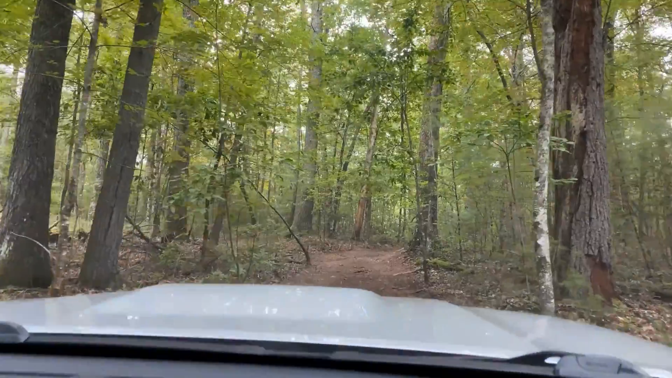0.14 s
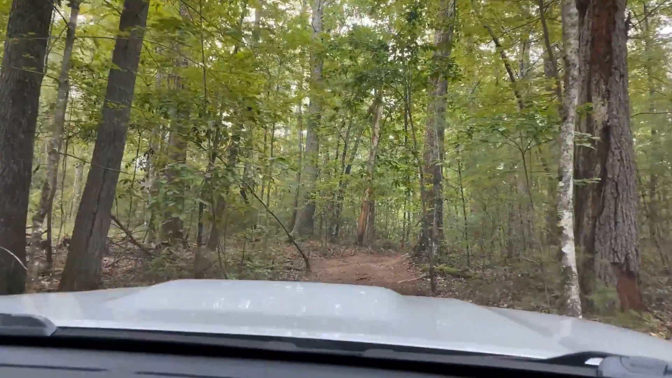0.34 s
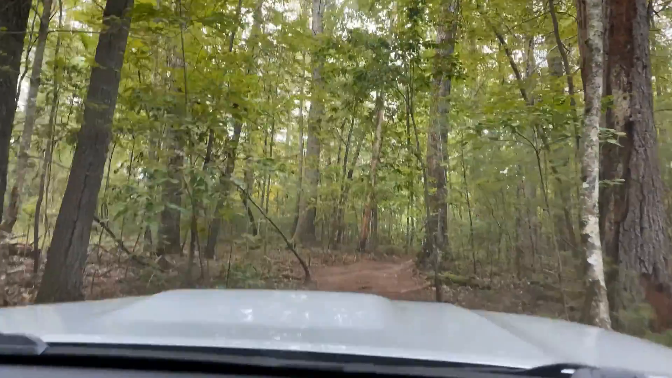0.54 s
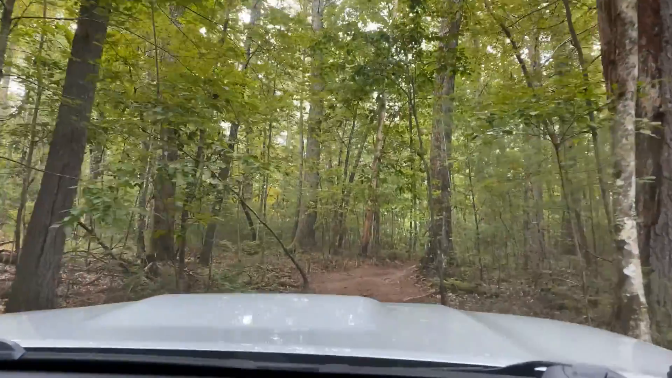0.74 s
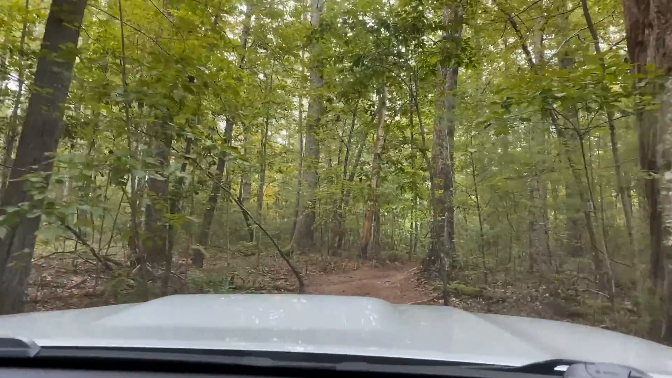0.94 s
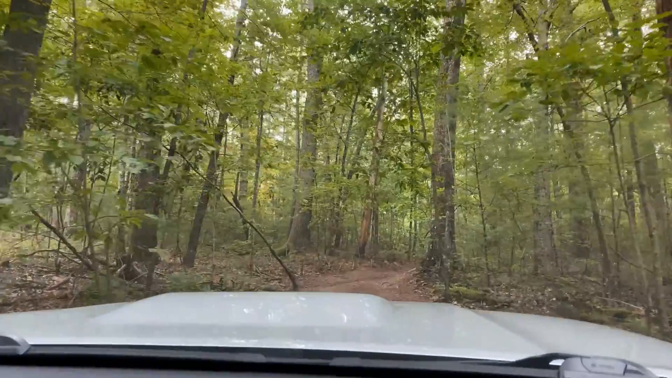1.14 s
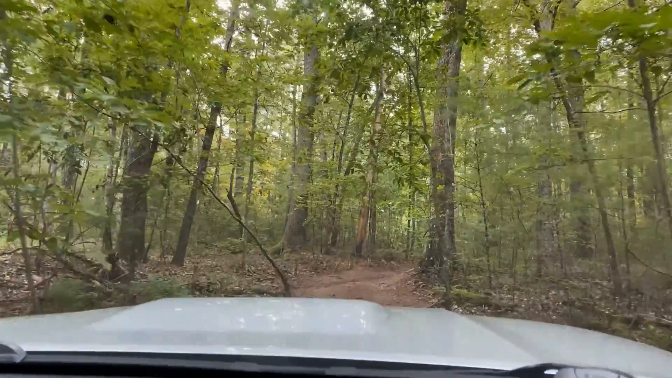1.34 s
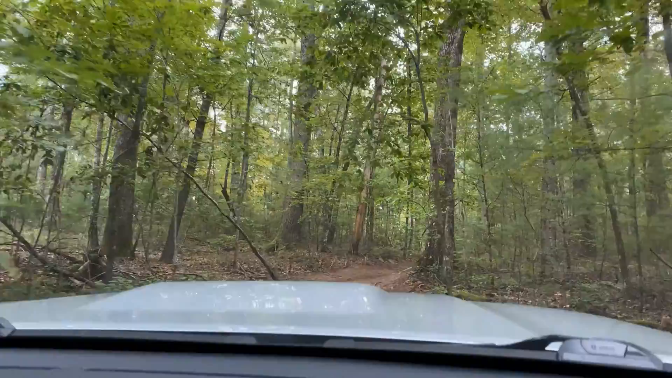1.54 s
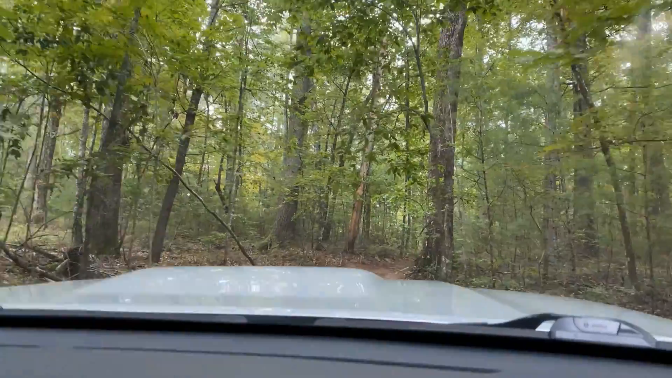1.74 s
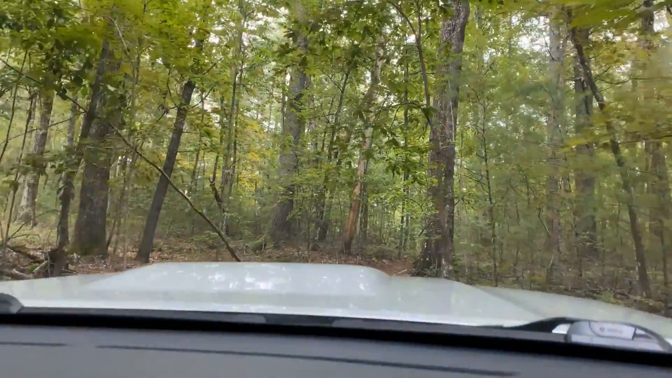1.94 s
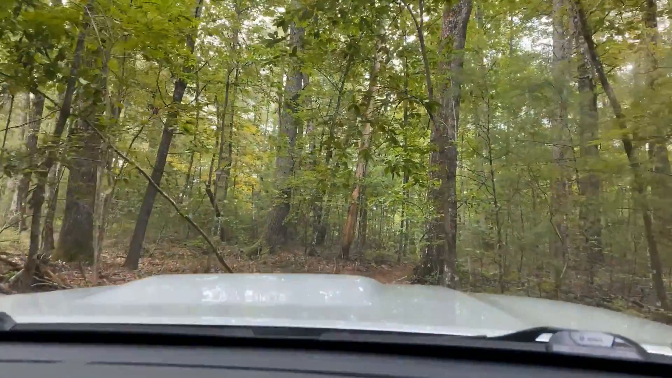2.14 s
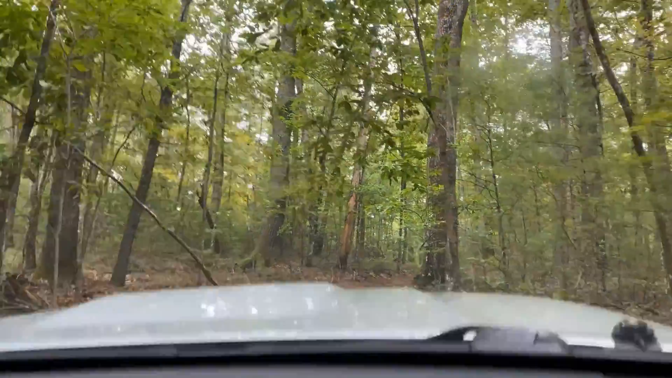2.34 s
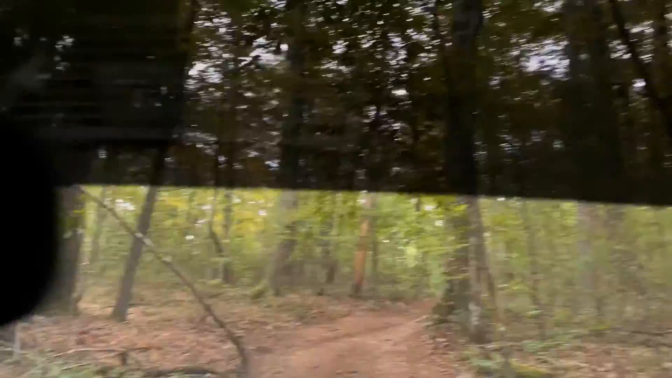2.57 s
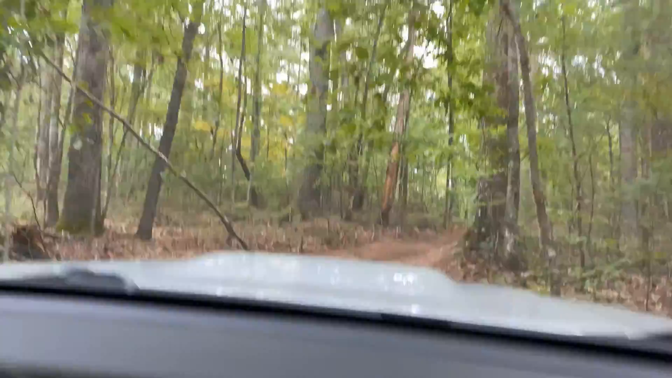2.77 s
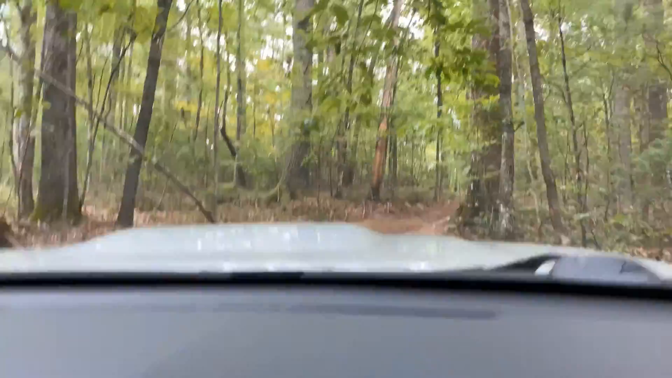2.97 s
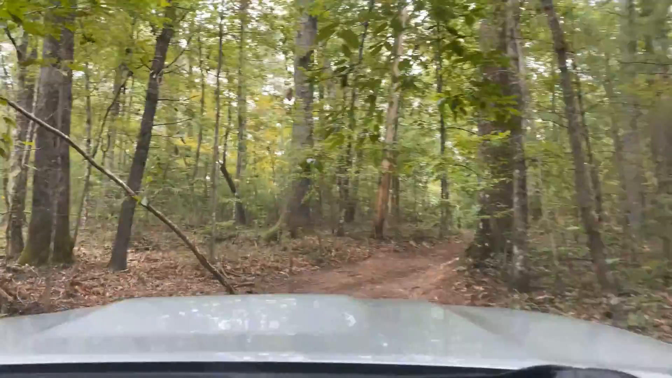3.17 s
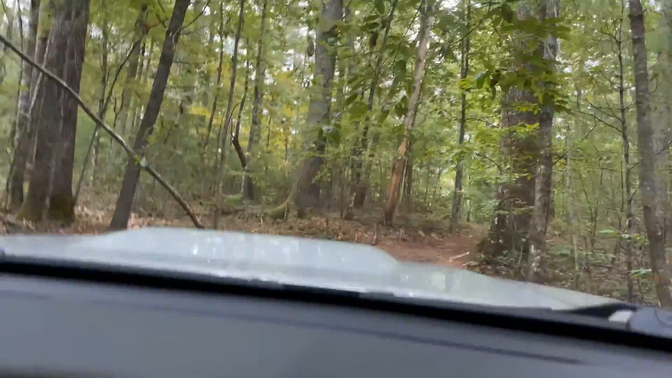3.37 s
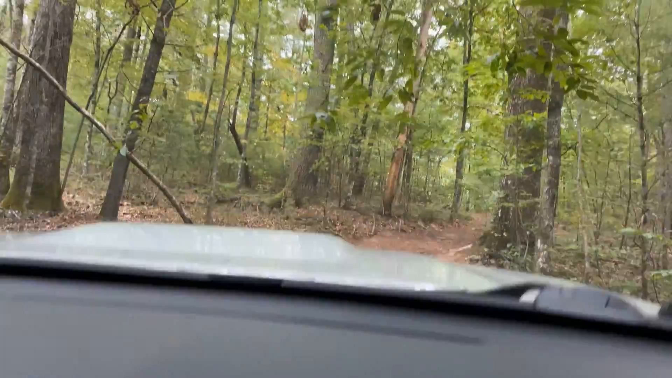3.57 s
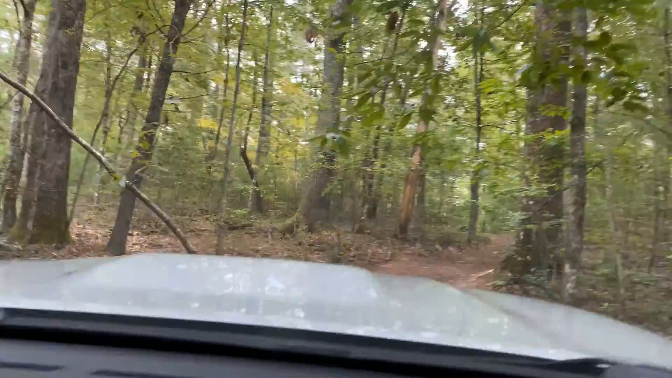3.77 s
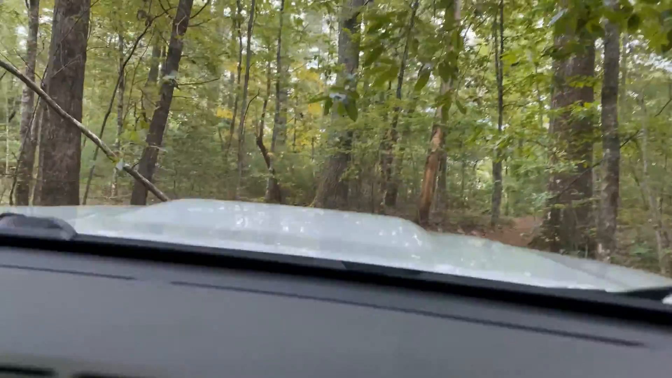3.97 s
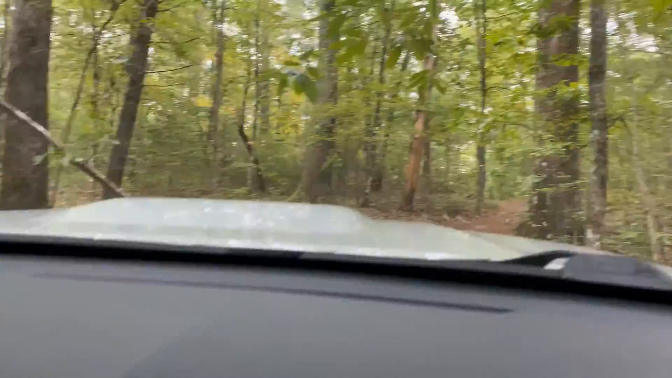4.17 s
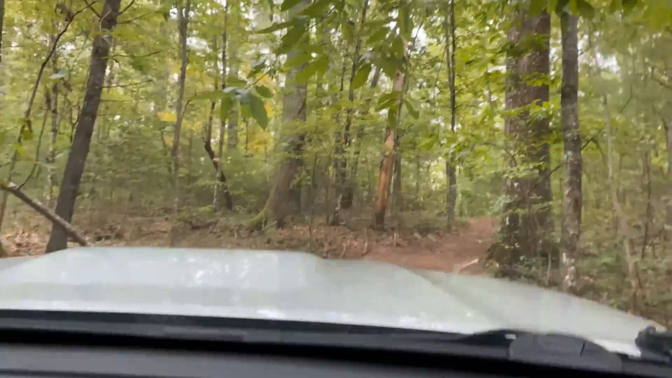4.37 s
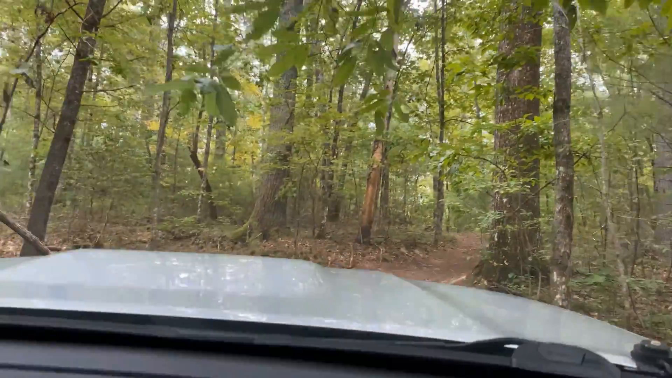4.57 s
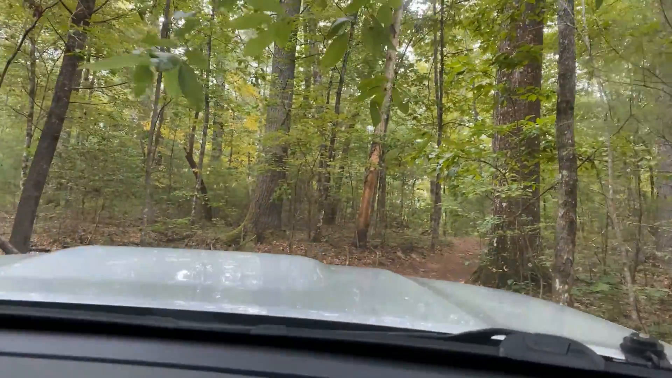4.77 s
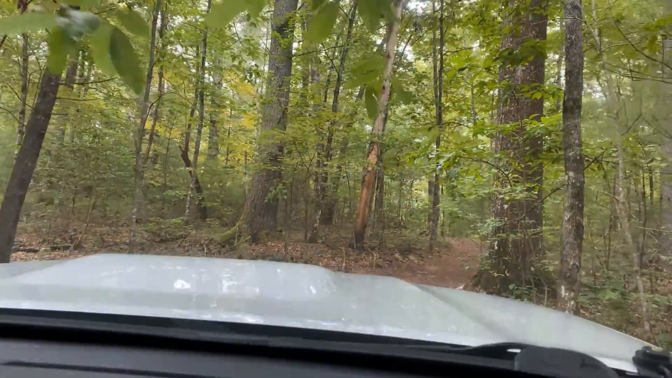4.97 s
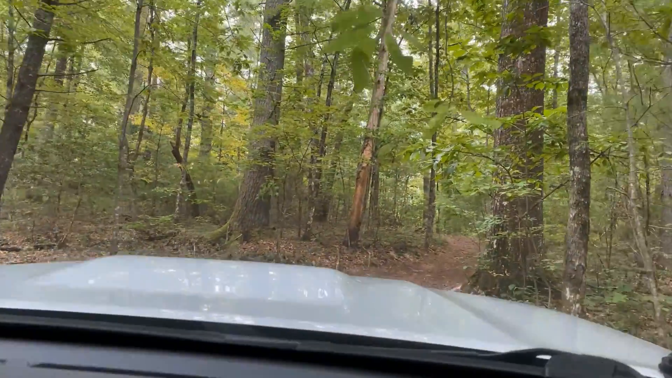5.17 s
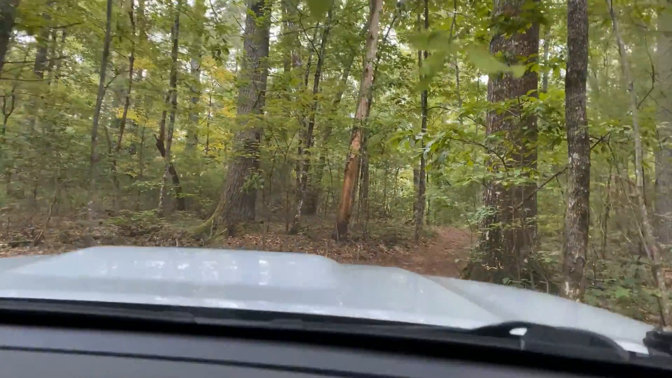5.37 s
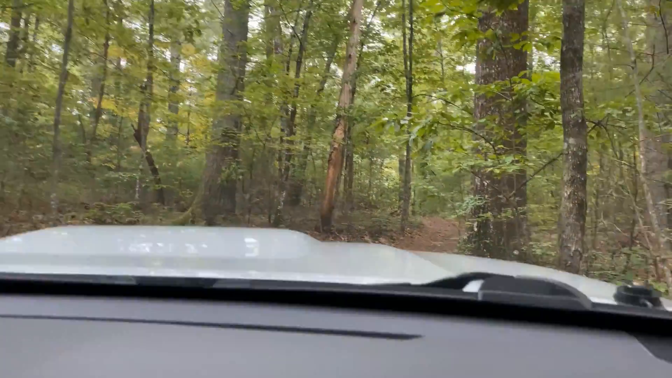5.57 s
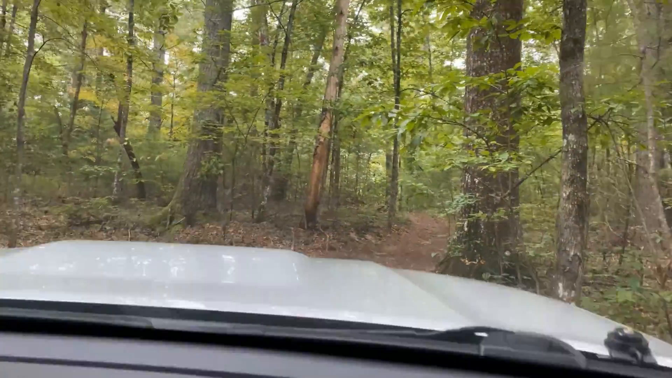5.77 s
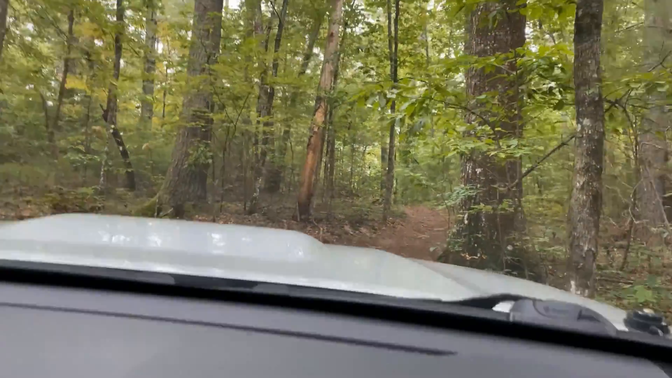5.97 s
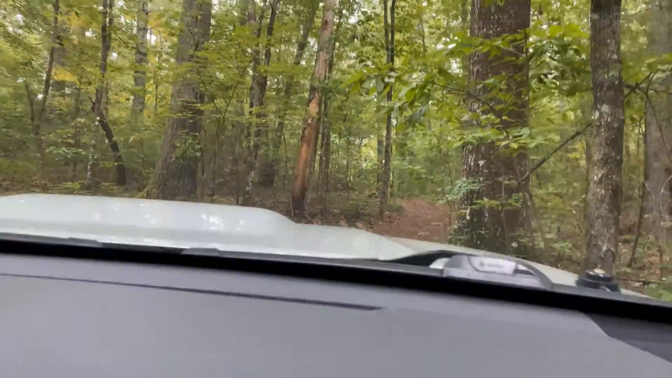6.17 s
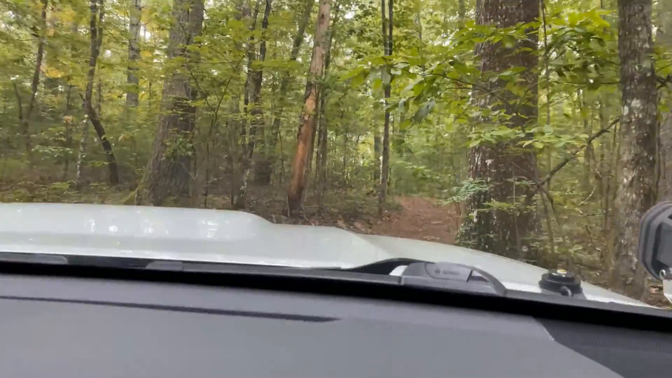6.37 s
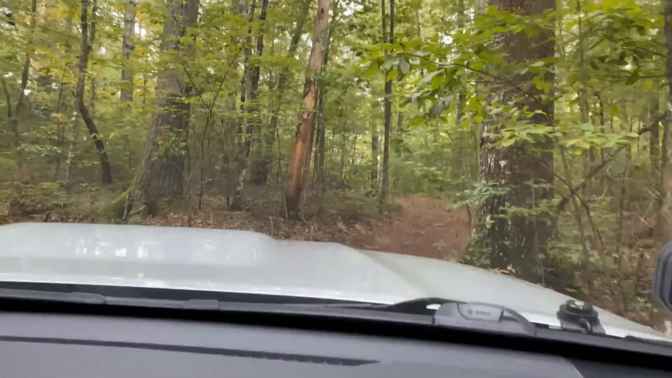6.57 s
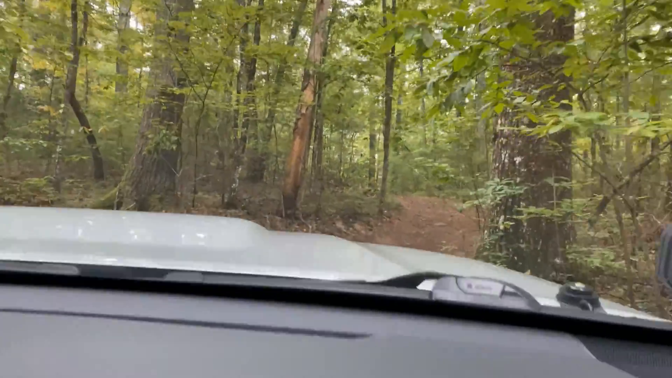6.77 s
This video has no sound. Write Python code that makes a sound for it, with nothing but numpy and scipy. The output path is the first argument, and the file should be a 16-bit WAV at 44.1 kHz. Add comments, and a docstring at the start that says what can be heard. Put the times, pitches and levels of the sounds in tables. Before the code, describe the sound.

An SUV crawls over a rutted forest track, heard in stereo inside the cab. A low, wavering engine drone runs throughout beneath the boom of the body. In the first second and a half a loose plastic load clacks and thumps the floor several times, with light key jingles and trim ticks. After a brief lull, the boom swells at about 2.2 seconds and is strongest until 2.8, with a heavy double thud at 2.6. From there to about 4.4 seconds the load clatters hard, with sharp snaps, the crackly rustle of sliding things and brighter jingling keys. The rumble and rustle then ease, leaving the engine hum, softer knocks and small shakes of the keys. Louder clacks return around 5.8, 6 and 6.6 seconds, and a metal piece pings faintly once at 6.5.

```python
"""The body of a six-cylinder SUV booms as it crawls over a rutted forest track, heard inside the cab. Tyres and
springs shake the shell, and under that boom the engine drones on its firing tone. A loose plastic load clacks
and thumps the floor; things slide and rustle as the car lurches. Keys jingle on their ring, trim panels tick
and a small metal part pings once. A phone picks it all up in stereo through its two microphone ports."""
import sys
import numpy as np
from scipy import signal
from scipy.fft import rfft, irfft, next_fast_len
from scipy.io import wavfile
from scipy.ndimage import uniform_filter1d

SR = 44100
rng = np.random.default_rng(int(sys.argv[2]) if len(sys.argv) > 2 else 0)


def dump_mix(stems):
    """Bounce the given channels to the path in sys.argv[1] as a 16-bit WAV at rate SR."""
    frames = np.atleast_2d(stems).T  # one column per channel
    limited = np.clip(frames, -1, 1)  # hard clip at full scale
    pcm = np.round(limited * 32767).astype(np.int16)
    wavfile.write(sys.argv[1], SR, pcm)


N = 300321
BODY_LAG_S, LOAD_LAG_S, KEYS_LAG_S = .00018, .000276, -.000205  # how late each reaches the left port

# Tone colour of the shell. Each row: frequency in Hz, relative level in dB.
BOOM_SPECTRUM = [(20, -17.5), (45, -1), (98, -6.5), (159, -11), (278, -20.5), (390, -25.5), (455, -23),
                 (555, -35), (620, -35.5), (850, -31.5), (1010, -36), (1100, -40), (1400, -44),
                 (2500, -45.5), (3100, -56), (9000, -67.5), (16000, -100)]
# The ride over the ruts. Each row: time in seconds, boom gain in dB, rustle level in dB.
RIDE = [(0, -31.5, -54), (.75, -27.5, -57.5), (1.1, -32, -61.5), (1.7, -24.5, -78), (2.05, -33.5, -87),
        (2.2, -21, -52.5), (2.4, -15.5, -36.5), (2.52, -20.5, -45.5), (2.68, -15, -38.5), (2.9, -25, -32.5),
        (3.1, -24.5, -44), (3.5, -24.5, -40), (4.3, -30, -42), (4.5, -38, -51.5), (5.4, -35.5, -59),
        (5.75, -34.5, -45), (5.95, -34, -52), (6.81, -35.5, -58)]
def body_boom():
    """Tyres and springs shake the shell; the bass follows the ruts, the hum above it swells far less."""
    boom_db, _ = curves(RIDE)
    hum = diffuse_noise(BOOM_SPECTRUM, undb(1.6 * wander(12)))
    bass = signal.sosfilt(signal.butter(2, 230, fs=SR, output="sos"), hum)
    return bass * undb(boom_db) + (hum - bass) * undb(-15 + .52 * boom_db)


# The ring of the plastic. Each row: frequency in Hz, level in dB, time to fade 60 dB in seconds.
PLASTIC_MODES = [(480, -19, .07), (720, 1, .06), (940, 0, .055), (1080, -1, .07), (1230, -4, .045),
                 (1550, 0, .04), (1960, 3, .03), (2250, -2, .03)]
def plastic_ring(t, centre_hz):
    """Struck plastic rings near centre_hz. Returns a clean, focused ring and a short, broad one."""
    gain, detune = rng.standard_normal((2, len(PLASTIC_MODES)))
    octaves_off = np.abs(np.log2(np.transpose(PLASTIC_MODES)[0] / centre_hz))
    damping = .92 * np.exp(-t / .005) + .08  # the contact damps the ring at first
    clean = ring(PLASTIC_MODES, 1.5 * gain - 11 * octaves_off, .02 * detune, t) * damping
    push = np.hanning(int(.00035 * SR))
    clean = np.convolve(clean * np.minimum(t / .0008, 1), push)[:len(t)]
    broad = ring(PLASTIC_MODES, .5 * gain - 3 * octaves_off, .04 * detune, t) * np.exp(-t / .004)
    return clean, broad


# The load hits and rebounds. Each row: start in seconds, level in dB, centre of the clack in Hz.
LOAD_HITS = [(0.2474, -16.5, 1110), (.259, -19, 900), (0.543, -27, 1010), (.602, -16.5, 1160),
             (0.615, -23, 730), (0.822, -18, 1120), (0.837, -17, 850), (.994, -27, 1780),
             (1.345, -20.5, 850), (2.255, -16, 1150), (2.269, -18.5, 680), (2.352, -21.5, 1100),
             (2.422, -12, 1370), (2.441, -6, 1870), (2.617, -22.5, 905), (2.741, -10.5, 1360),
             (2.867, -21.5, 850), (3.163, -11.5, 1050), (3.172, -8, 1600), (3.205, -19.5, 1010),
             (3.271, -20, 1000), (3.332, -29.5, 1910), (3.495, -12.5, 980), (3.503, -11, 696),
             (3.626, -22.5, 900), (3.706, -7, 1780), (3.749, -16, 1110), (3.914, -29.5, 1500),
             (3.9465, -16, 890), (4.004, -23.5, 800), (4.047, -12, 1900), (4.057, -7.5, 1100),
             (4.066, -18, 1100), (4.21, -24, 805), (4.394, -11.5, 1964), (4.402, -12, 980),
             (4.425, -19, 945), (4.841, -25, 1290), (5.091, -20, 1220), (5.105, -19.5, 820),
             (5.416, -21.5, 1110), (5.44, -29, 1908), (5.603, -31.5, 1130), (5.805, -13, 1740),
             (5.818, -11.5, 985), (5.932, -27.5, 1530), (6.032, -14, 1430), (6.042, -12, 960),
             (6.296, -33, 1250), (6.577, -18.5, 1070), (6.6, -21.5, 956)]
def load_knocks(lead_in_s=.03):
    """The load clacks and thumps the floor; the harder the blow, the more it cracks."""
    out, t, last_s = np.zeros((2, N)), seconds(.15), 0
    for s, db, centre_hz in LOAD_HITS:
        chatter, crack = contact(t)
        clean, broad = plastic_ring(t, centre_hz)
        ragged = signal.fftconvolve(broad, chatter)[:len(t)]
        clack = peak(clean, db) + peak(ragged, db - 2)
        if s - last_s > lead_in_s:  # given room, a faint, brief swell of noise leads into the clack
            swell = rng.standard_normal(len(t)) * (t / lead_in_s) ** 2 * (t < lead_in_s)
            lead_in = signal.fftconvolve(broad, swell)[:len(t)]
            place(out, s - lead_in_s, peak(lead_in, db - 13), LOAD_LAG_S)
        crack = peak(crack, db + max(1.3 * db - 1, -16))
        thump = peak(floor_thump(t), min(db - 1, -17.5))  # the floor gives no more than this
        place(out, s, clack + crack + thump, LOAD_LAG_S)
        last_s = s
    return out


def contact(t):
    """Sparse micro-contacts build, then die within milliseconds. Returns their chatter and bright crack."""
    grit, hiss, spread = rng.standard_normal((3, len(t)))
    decay = np.exp(-t / .0029) + .12 * np.exp(-(t / .022) ** 2)
    chatter = np.minimum(t / .004, 1) * grit * np.exp(.57 * spread) * decay
    snap = 6 * np.minimum(t / .0006, 1) * hiss * (np.exp(-t / .003) + .35 * np.exp(-t / .011))
    bright = signal.butter(1, [2600, 9000], "bandpass", fs=SR, output="sos")
    return chatter, signal.sosfilt(bright, signal.sosfilt(bright, chatter + snap))


# Bright snaps. Each row: start in seconds, level in dB.
SNAP_HITS = [(0.134, -30.5), (1.648, -44.5), (0.57, -28), (2.232, -29), (2.244, -19), (2.523, -40),
             (2.711, -43), (2.745, -16), (2.781, -30), (2.825, -16.5), (2.868, -25.5), (2.892, -13.5),
             (3.268, -26), (3.426, -38), (3.445, -30.5), (3.503, -16.5), (3.525, -13), (3.594, -38),
             (3.622, -26.5), (4.212, -16.5), (6.652, -40)]
def snaps():
    """The crack of a contact alone, with no ring."""
    out, t = np.zeros((2, N)), seconds(.15)
    for s, db in SNAP_HITS:
        _, crack = contact(t)
        place(out, s, peak(crack, db), LOAD_LAG_S)
    return out


# The low ring of the floor. Each row: frequency in Hz, level in dB, time to fade 60 dB in seconds.
FLOOR_MODES = [(124.5, -1, 0.1), (178, 3, 0.06), (250, -3, .05), (345, -3, 0.075), (455, -12, .07)]
def floor_thump(t, db_per_octave=0, rise_s=.016):
    """The floor answers a blow, its modes swelling a little late."""
    gain, detune = rng.standard_normal((2, len(FLOOR_MODES)))
    hz = np.transpose(FLOOR_MODES)[0]
    tilt_db = db_per_octave * np.log2(hz / hz[0])
    return ring(FLOOR_MODES, 2 * gain + tilt_db, .028 * detune, t) * np.minimum(t / rise_s, 1) ** 2


def heavy_drop():
    """Something heavy lands with a double thud; a hard drop favours the upper floor modes."""
    out, t = np.zeros((2, N)), seconds(.15)
    for s, db in (2.603, -18), (2.614, -11):
        thud = floor_thump(t, db_per_octave=8, rise_s=.0021) * np.exp(-t / .056)
        place(out, s, peak(thud, db), BODY_LAG_S)
    return out


# The engine's lope. Each row: multiple of the firing rate, level in dB against the firing tone.
LOPE_ORDERS = [(.5, -7), (1.5, -7.5)]
# The drone. Each row: time in seconds, firing rate in Hz, firing tone level in dB, octave level in dB.
ENGINE_DRONE = [(0, 70, -37, -64), (1.3, 72.6, -35.5, -47.5), (2.1, 76.04, -64, -39),
                (2.6, 65.2, -36, -39.5), (3.3, 61.2, -35.5, -42.5), (4.25, 48.58, -38, -53),
                (4.56, 55.1, -38.5, -36.5), (4.68, 61.2, -33.5, -47.5), (5.0, 72.4, -37.5, -41),
                (5.3, 70.97, -35.5, -45), (5.55, 65.4, -34, -34.5), (6.0, 62.64, -35, -36.5),
                (6.3, 66.04, -38.5, -36), (6.61, 62.74, -32, -36.5), (6.81, 61.85, -39, -63)]
def engine():
    """Firing tone and octave, with half orders from unequal cylinders; each wavers with engine load."""
    firing_hz, firing_db, octave_db = curves(ENGINE_DRONE)
    phase = 2 * np.pi * np.cumsum(firing_hz * (1 + .01916 * wander(14))) / SR
    orders = [(1, firing_db), (2, octave_db)] + [(order, firing_db + db) for order, db in LOPE_ORDERS]
    drone = np.zeros(N)
    for order, db in orders:
        level = undb(db + 5 * wander(7) + 5 * wander(25))
        drone += level * np.sin(order * phase + rng.uniform(0, 2 * np.pi))
    return ports(np.sqrt(2) * drone, BODY_LAG_S)


# Tone colour of the sliding things. Each row: frequency in Hz, relative level in dB.
RUSTLE_SPECTRUM = [(250, 5.5), (700, 7.5), (1500, 6), (3000, -0.5), (6500, -4.5), (11000, -14.5),
                   (14500, -15)]
def rustle():
    """Cloth and loose bits slide: uneven grains that crackle in short runs."""
    _, rustle_db = curves(RIDE)
    grains = undb(5.5 * wander(700) + 5.5 * wander(70) + 2.5 * wander(14))
    return undb(rustle_db) * diffuse_noise(RUSTLE_SPECTRUM, grains)


# The shimmer of the keys. Each row: frequency in Hz, level in dB, time to fade 60 dB in seconds.
KEY_MODES = [(4520, -17, .05), (7370, -8, .08), (8310, -6, .045), (11600, 0, .05), (12900, -10, .035),
             (13600, -5, .035), (14640, -1, .04)]
# The clear shakes of the key ring. Each row: start in seconds, level in dB.
KEY_SHAKES = [(0.027, -30.5), (0.301, -33.5), (0.594, -37), (1.186, -37), (1.43, -42), (1.4507, -36),
              (2.806, -23), (3.192, -22.5), (3.71, -20), (3.745, -23.5), (3.762, -22), (3.966, -30.5),
              (4.128, -33), (4.354, -35), (4.5237, -29), (4.6844, -34.5), (4.752, -29), (4.876, -34.5),
              (4.934, -39), (4.996, -34), (5.2071, -32.5), (5.539, -35), (5.583, -34.5), (5.86, -33.5),
              (6.259, -37.5), (6.283, -29.5), (6.323, -33), (6.403, -42.5), (6.4858, -25), (6.779, -43)]
def keys(faint_db=-49, rest_s=(1.5, 2.2)):
    """Each shake is a handful of ringing, scraping clinks; faint ones fall at random outside rest_s."""
    out, t = np.zeros((2, N)), seconds(.07)
    bright = signal.butter(1, [3500, 15800], "bandpass", fs=SR, output="sos")
    faint = [(s, db) for s, db in scatter(48, faint_db, range_db=9) if not rest_s[0] < s < rest_s[1]]
    for s, db in KEY_SHAKES + faint:
        shake = np.zeros(int(.16 * SR))
        clinks = 8 if db > faint_db else 3
        for lateness in np.r_[0, rng.random(clinks - 1)]:
            gain, detune, force = rng.standard_normal((3, len(KEY_MODES)))
            scrape = rng.standard_normal(len(t)) * np.exp(-t / .0061) * np.minimum(t / .0056, 1)
            metal = ring(KEY_MODES, 5 * gain, .006 * detune, t) * np.minimum(t / .0015, 1)
            clink = metal + 1.8 * signal.sosfilt(bright, scrape)
            at = int(lateness * .04 * SR)
            shake[at:at + len(t)] += clink * undb(4 * force[0] - 7 * lateness)
        place(out, s, peak(shake, db) * signal.windows.tukey(len(shake), .04), KEYS_LAG_S)
    return out


# The clearest ticks of the trim. Each row: start in seconds, level in dB.
TRIM_TICKS = [(0.288, -32.5), (0.748, -37), (4.507, -40), (1.111, -40), (1.559, -35.5), (1.751, -35),
              (2.041, -35)]
def trim_ticks():
    """Trim panels tick as the body twists, with softer ticks scattered at random."""
    out, t = np.zeros((2, N)), seconds(.06)
    panel = signal.butter(2, [930, 1090], "bandpass", fs=SR, output="sos")
    for s, db in TRIM_TICKS + scatter(45, top_db=-39, range_db=11):
        tick = signal.sosfilt(panel, rng.standard_normal(len(t)) * np.exp(-t / .004))
        place(out, s, peak(tick, db), LOAD_LAG_S)
    return out


def metal_ping(start_s=6.488, db=-37, hz=4520):
    """A small metal part is struck and rings in one clear mode."""
    out, t = np.zeros((2, N)), seconds(.15)
    mode = np.sin(2 * np.pi * hz * t) * fade(t, t60=.07) * np.minimum(t / .018, 1)
    place(out, start_s, peak(mode, db), KEYS_LAG_S)
    return out


def cab_reflections(x, t60=.04):
    """Seats and glass return a short tail, new for each sound and port, too short to smear the bass."""
    t = seconds(t60)
    tail = rng.standard_normal((2, len(t))) * fade(t, t60)
    tail = signal.sosfilt(signal.butter(1, 150, "highpass", fs=SR, output="sos"), tail)
    tail /= np.sqrt((tail ** 2).sum() / 2)
    return signal.fftconvolve(x[None], tail, axes=1)[:, :len(x)]


def place(out, s, sound, lag_s, cab_db=-4):
    """Lay a short sound at s seconds; the direct path and the cab's reflections share its power."""
    at = int(s * SR)
    heard = (ports(sound, lag_s) + undb(cab_db) * cab_reflections(sound)) / np.sqrt(1 + undb(2 * cab_db))
    out[:, at:at + len(sound)] += heard[:, :N - at]


# Stereo width of the noise. Each row: frequency in Hz, share of the power common to both ports.
PORT_LIKENESS = [(60, 0.96), (130, 0.94), (300, 0.21), (1000, 0.14), (4000, 0.32)]
def diffuse_noise(colour, envelope):
    """Coloured noise driven by an envelope: alike at both ports in the bass, wide above, rms of one."""
    size = next_fast_len(N)
    hz = np.fft.rfftfreq(size, 1 / SR)
    share = np.clip(across(PORT_LIKENESS, hz), 0, 1)
    common, left, right = rfft(rng.standard_normal((3, N)) * envelope, size) * undb(across(colour, hz))
    sides = np.array([irfft(np.sqrt(1 - share) * side, size)[:N] for side in (left, right)])
    noise = ports(irfft(np.sqrt(share) * common, size)[:N], BODY_LAG_S) + sides
    return noise / np.sqrt(np.mean(noise ** 2))


def ports(x, lag_s):
    """One source at both microphone ports; the left one hears it lag_s later."""
    size = next_fast_len(len(x) + 64)
    delay = np.exp(-2j * np.pi * np.fft.rfftfreq(size, 1 / SR) * lag_s)
    return np.array([irfft(rfft(x, size) * delay, size)[:len(x)], x])


def ring(modes, gain_db, detune, t):
    """A struck object: decaying modes, each with its own gain and detuning for this blow."""
    hz, db, t60 = np.transpose(modes)[:, :, None]
    tones = np.sin(2 * np.pi * hz * (1 + detune[:, None]) * t) * fade(t, t60)
    return (undb(db + gain_db[:, None]) * tones).sum(axis=0)


def scatter(count, top_db, range_db):
    """Random events as (start in seconds, level in dB)."""
    return [(when * N / SR, top_db - range_db * softness) for when, softness in rng.random((count, 2))]


def wander(rate):
    """Smooth random drift that takes a new level rate times a second."""
    hold = int(SR / rate)
    steps = np.repeat(rng.standard_normal(N // hold + 1), hold)
    return .59 * uniform_filter1d(uniform_filter1d(steps, hold), hold)[:N]


def curves(table):
    """Columns of a timed table, one value per sample."""
    s, *columns = np.transpose(table)
    return [np.interp(np.arange(N) / SR, s, column) for column in columns]


def across(table, hz):
    """A (Hz, value) table read on a log-frequency axis."""
    at, value = np.transpose(table)
    return np.interp(np.log(np.maximum(hz, 1)), np.log(at), value)


def fade(t, t60):
    """A decay of 60 dB every t60 seconds."""
    return np.exp(-np.log(1000) * t / t60)


def peak(x, db):
    """Scale to a peak level."""
    return x * undb(db) / np.abs(x).max()


def seconds(length_s):
    return np.arange(int(length_s * SR)) / SR


def undb(db):
    return 10 ** (np.asarray(db) / 20)


def scene():
    """Everything in the cab, at both ports."""
    loose_things = load_knocks() + snaps() + heavy_drop() + trim_ticks() + keys() + metal_ping()
    return engine() + body_boom() + rustle() + loose_things


def record(dry):
    """The phone: the bass leans to the right port, the loudest peaks are rounded and the top is cut."""
    bass = signal.sosfilt(signal.butter(1, 220, fs=SR, output="sos"), dry)
    bass_gain = undb([[-1.6], [1.6]])  # left, right
    rounded = np.tanh(dry + (bass_gain - 1) * bass)
    return signal.sosfilt(signal.ellip(10, .2, 80, 15900, fs=SR, output="sos"), rounded)


dry = scene()
out = record(dry)
dump_mix(out)
```